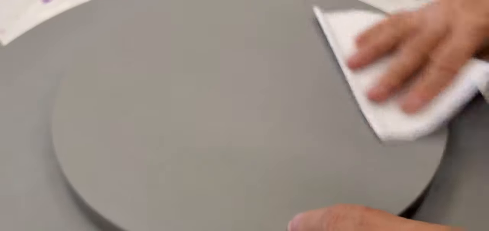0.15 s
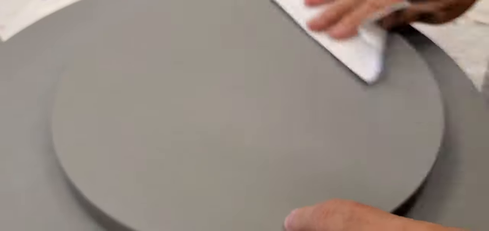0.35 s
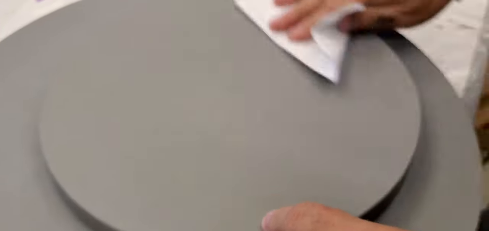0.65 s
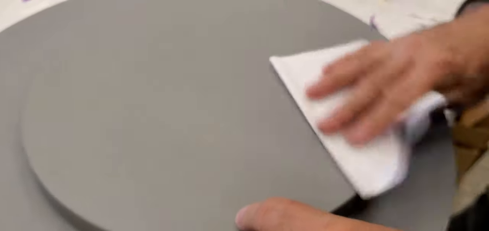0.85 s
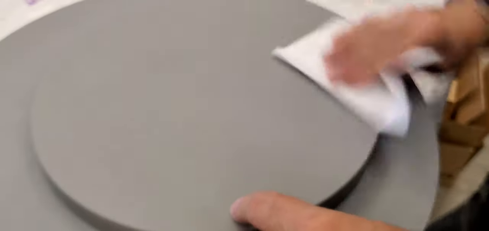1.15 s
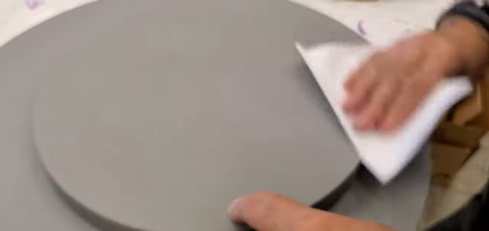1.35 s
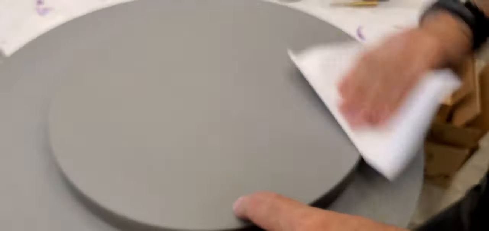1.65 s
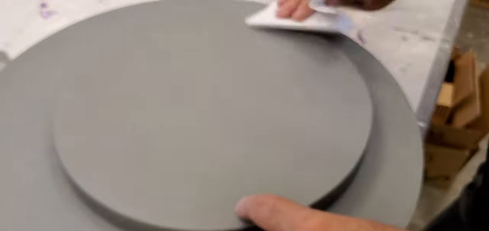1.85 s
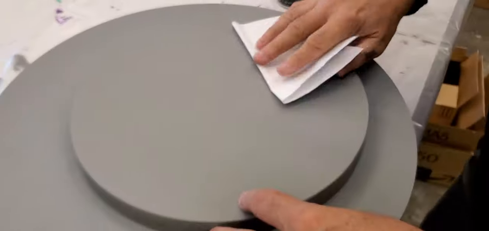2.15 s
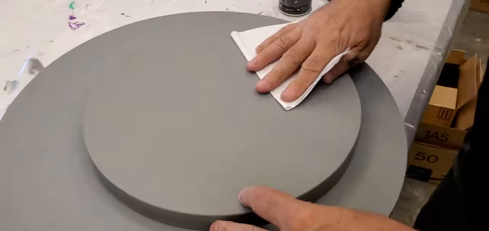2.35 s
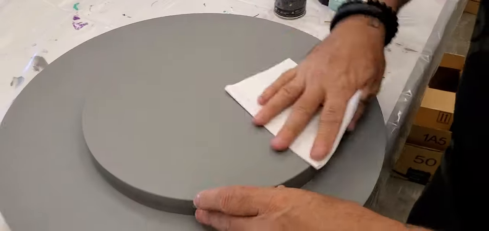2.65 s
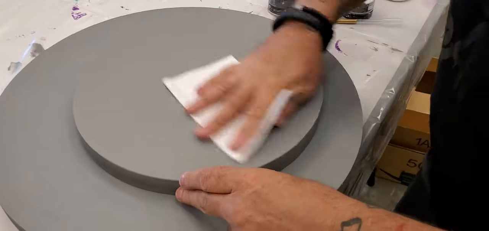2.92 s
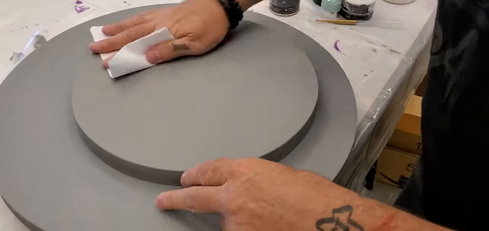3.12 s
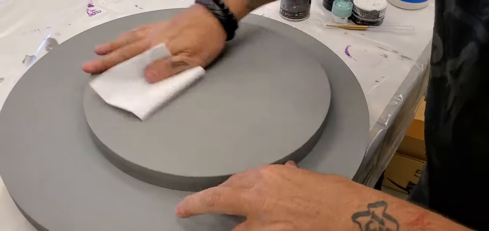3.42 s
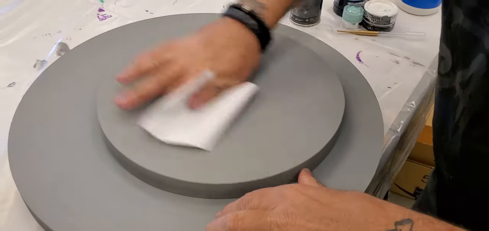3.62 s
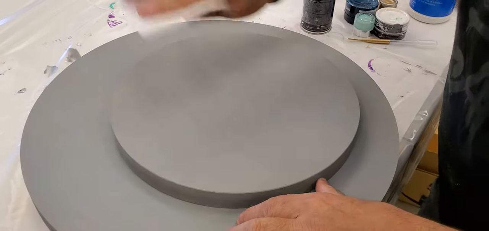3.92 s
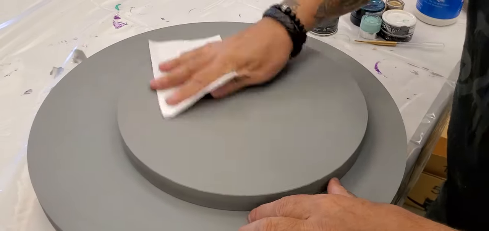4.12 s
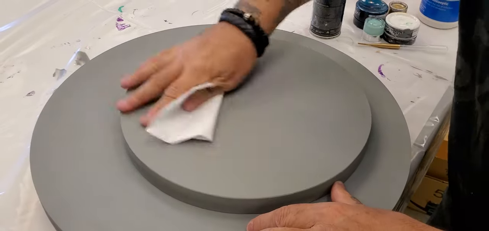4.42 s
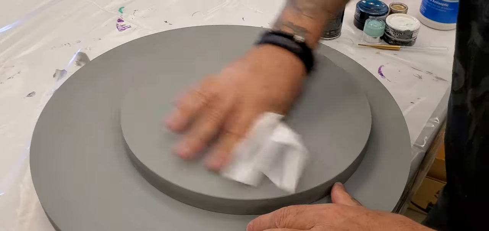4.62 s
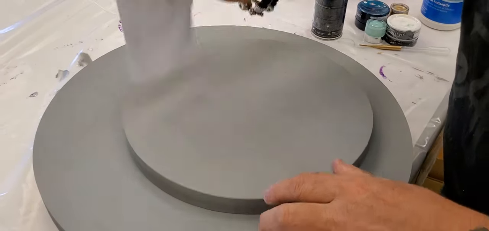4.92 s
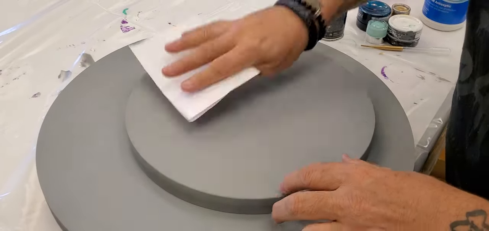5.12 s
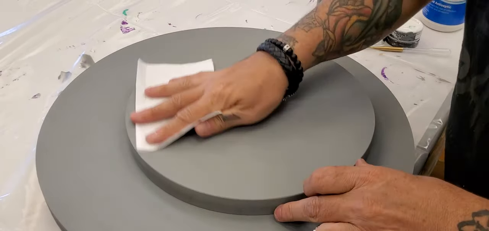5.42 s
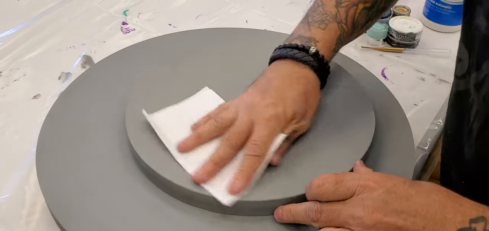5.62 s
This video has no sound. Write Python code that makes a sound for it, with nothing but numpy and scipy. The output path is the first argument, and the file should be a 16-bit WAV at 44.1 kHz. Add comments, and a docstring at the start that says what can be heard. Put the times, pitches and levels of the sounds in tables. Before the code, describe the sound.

Close to a small stereo microphone in a quiet, dry room, folded paper rubs a painted wooden disc. Bright hissing strokes, about six or seven a second, dip at every turn, with rustle and snapping creases. Around two seconds they break off into light crackles, then resume, and later become weaker and more scattered. Soft wooden knocks and tiny squeaks appear; low ventilation rumble and motor hum continue underneath.

```python
"""Indoors, a quiet room: a steady ventilation rumble and a motor's wavering hum, under everything.
From the start a folded sheet of paper is rubbed to and fro on a painted wooden disc, close to a small stereo
microphone: shaped noise hisses with the speed of the hand, nearly silent at each turn, over a crackling rustle.
Soon creases snap (short rings with noise ticks), then knocks ring the wood (decaying sines), and later
folds squeak (uneven noise through one resonance). The strokes grow weaker towards the end."""
import sys
import numpy as np
from scipy import signal
from scipy.fft import rfft, irfft, next_fast_len
from scipy.io import wavfile
from scipy.ndimage import uniform_filter1d, map_coordinates

SR = 44100
rng = np.random.default_rng(int(sys.argv[2]) if len(sys.argv) > 2 else 0)


def unload_wav(signal):
    """Save mono or channel-first audio to the path in sys.argv[1] as 16-bit WAV at rate SR, clipped to [-1, 1]."""
    wavfile.write(
        sys.argv[1],
        SR,
        np.round(np.clip(np.atleast_2d(signal).T, -1, 1) * 32767).astype(np.int16),
    )


N = 254456


def amp(db):
    """Gain of a level in dB."""
    return 10 ** (np.asarray(db) / 20)


def unit(x):
    """x scaled to rms 1."""
    return x / np.sqrt(np.mean(x ** 2) + 1e-20)


def along(points, hz):
    """Read (f/Hz, value) points on a log frequency axis."""
    f, value = np.transpose(points)
    return np.interp(np.log(hz + 1), np.log(f + 1), value)


def curves(rows):
    """One value per sample for each column after the time."""
    s, *columns = np.transpose(rows)
    return [np.interp(np.arange(N) / SR, s, column) for column in columns]


def wobble(rate):
    """A smooth random curve, rate knots a second."""
    knots = rng.standard_normal(int(N * rate / SR) + 4)
    return map_coordinates(knots, [np.arange(N) * rate / SR])


def running(x, span_s):
    """Mean over the surrounding span."""
    return np.abs(uniform_filter1d(x, size=round(span_s * SR)))


def since(s, span_s):
    """The samples of a span, and the time since its start."""
    part = slice(max(round(s * SR), 0), max(round((s + span_s) * SR), 0))
    return part, np.arange(N)[part] / SR - s


def filtered(x, response):
    """x through a response given as a function of frequency."""
    m = next_fast_len(N + SR // 2)
    return irfft(rfft(x, m) * response(np.fft.rfftfreq(m, 1 / SR)), m)[..., :N]


def tilted(x, tilt_db, pivot_hz):
    """Treble up and bass down about a pivot, half the tilt each, by an amount that may move."""
    top = filtered(x, lambda hz: 1 / (1 + (pivot_hz / (hz + 1)) ** 8))
    return (x - top) * amp(-tilt_db / 2) + top * amp(tilt_db / 2)


# likeness of the two channels, near in the bass and unrelated in the treble: (f/Hz, correlation)
CHANNEL_LIKENESS = [(60, 0.95), (240, 0.95), (950, 0.21), (3770, 0.057), (15000, 0.0)]


def stereo(pair, spectrum):
    """Two unrelated signals coloured, then mixed as mid and side to the set likeness; rms 1."""
    def mid_side_gains(hz):
        turn = np.arccos(np.clip(along(CHANNEL_LIKENESS, hz), -1, 1)) / 2
        return amp(along(spectrum, hz)) * [np.cos(turn), np.sin(turn)]

    mid, side = filtered(pair, mid_side_gains)
    return unit(np.array([mid + side, mid - side]))


def gritty(grit_db, clump_db, rate):
    """Noise for two channels with uneven contacts: spiky samples in shared clumps."""
    spikes = amp(grit_db * np.minimum(rng.standard_exponential((2, N)), 5))
    clumps = amp(clump_db * 2 * np.tanh(wobble(rate) / 2))
    return unit(clumps * spikes * rng.standard_normal((2, N)))


def patched(pair, patchy_db, size=(5, 10)):
    """Random patches of gain, size in (frequency bins, time frames), shared by both channels."""
    z = signal.stft(pair, nperseg=256)[2]
    field = rng.standard_normal(z.shape[1:])
    for axis in (0, 1):
        field = uniform_filter1d(field, size=size[axis], axis=axis)
    return signal.istft(z * amp(patchy_db * unit(field)), nperseg=256)[1][:, :N]


# colour of the ventilation rumble: (f/Hz, relative level/dB per Hz)
AIR_SPECTRUM = [(12, -41), (20, -6), (81, -0.5), (198, -12.5), (241, -19), (410, -20.5), (472, -19.5),
                (607, -27.5), (802, -26), (1190, -28.5), (1330, -26), (16000, -69)]
# duct resonances: (f/Hz, width/Hz, level/dB)
DUCT_RESONANCES = [(101.6, 14, -50), (185.4, 35, -67), (468, 68, -59.5)]
# slow changes of place and tone, also played by the hiss and the scene:
# (t/s, sheet left minus right/dB, hiss tilt about 9460 Hz/dB, hiss tilt about 5700 Hz/dB, hum level/dB)
SLOW_CHANGES = [(0, 1, 5, -1.5, -33), (1, 0, 3.5, -2.5, -34.5), (1.9, 0.5, 4.5, -6, -36),
                (2.6, 4, 2.5, -0.5, -40), (3.4, 2.5, 7, -2.5, -38), (4.2, 3, 1.5, 5, -37),
                (4.75, 3, 1.5, 2, -37.5), (5.77, 4, 1.5, 2, -35)]
MOTOR_HZ = 29.2  # shaft rate


def room_tone():
    """Ventilation noise with its duct resonances, and the wavering hum of a motor: shaft rate and its double."""
    out = amp(-41.0) * stereo(patched(rng.standard_normal((2, N)), patchy_db=1.5), AIR_SPECTRUM)
    for hz, width_hz, db in DUCT_RESONANCES:
        band = filtered(rng.standard_normal(N), lambda f: 1 / (1 + (2 * (f - hz) / width_hz) ** 2))
        out += amp(db) * unit(band)
    shaft = 2 * np.pi * MOTOR_HZ * np.arange(N) / SR + 0.3 * wobble(2.26)
    hum = amp(-5.5 + 1.9 * wobble(3.7)) * np.sin(shaft)
    hum += amp(1.5 * wobble(4.7)) * np.sin(2 * shaft)
    _, _, _, hum_db = curves(SLOW_CHANGES)
    return out + amp(hum_db) * hum


# strokes of the hand, light drags included:
# (start t/s, length/s, hiss level at full speed in mid-stroke/dB, pressure growth/dB per s, time to gain speed/s)
STROKES = [(-0.062, 0.076, -10.5, -3, 0.005), (0.014, 0.17, -16.5, -4, 0.053),
           (0.175, 0.14, -11.5, 3, 0.097), (0.311, 0.17, -12, 0, 0.113), (0.47, 0.15, -10, 16, 0.12),
           (0.61, 0.17, -11.5, -3, 0.12), (0.776, 0.14, -11, 11, 0.079), (0.912, 0.15, -16, 46, 0.026),
           (1.046, 0.13, -10.5, 56, 0.12), (1.176, 0.15, -12.5, 16, 0.119), (1.327, 0.15, -12.5, 26, 0.1),
           (1.471, 0.17, -20.5, 76, 0.012), (1.635, 0.14, -12.5, 29, 0.12), (1.756, 0.24, -16.5, 0, 0.119),
           (1.992, 0.21, -41.5, -112, 0.019), (2.139, 0.059, -25.5, 2, 0.025), (2.19, 0.28, -45, 30, 0.03),
           (2.426, 0.163, -17.5, 65, 0.119), (2.551, 0.18, -12, 26, 0.12), (2.727, 0.19, -17.5, -16, 0.078),
           (2.897, 0.16, -16.5, -16, 0.075), (3.053, 0.17, -16.5, -10, 0.078), (3.217, 0.13, -15, 7, 0.065),
           (3.335, 0.16, -20, 33, 0.12), (3.49, 0.14, -21, 3, 0.06), (3.625, 0.1, -15.5, 1, 0.056),
           (3.693, 0.16, -29, 110, 0.005), (3.803, 0.12, -51, -178, 0.005), (3.936, 0.061, -29, 3, 0.116),
           (4.001, 0.061, -46, -6, 0.016), (4.075, 0.12, -37, -10, 0.056), (4.163, 0.18, -22.5, 65, 0.031),
           (4.336, 0.16, -18.5, 51, 0.12), (4.496, 0.15, -21.5, -108, 0.063),
           (4.648, 0.12, -18.5, -17, 0.055), (4.758, 0.068, -25, -40, 0.013),
           (4.799, 0.15, -45.5, 80, 0.12), (5.05, 0.18, -57.5, -33, 0.013),
           (5.227, 0.13, -41.5, -130, 0.024), (5.3, 0.28, -27, 75, 0.12), (5.556, 0.31, -22, 46, 0.005)]
BRAKE_S, REST_DB = 0.053, -66.5  # time to lose speed before a turn; hiss power of the sheet at rest


def rub_power():
    """Each stroke gains speed, presses harder or lighter on its way and brakes; strokes add in power."""
    power = np.full(N, amp(REST_DB) ** 2)
    for s, length, db, grow_db, gain_s in STROKES:
        part, u = since(s, length)
        speed = np.tanh(u / gain_s) * np.tanh((length - u) / BRAKE_S)
        pressure = amp(db + grow_db * (u - length / 2))
        power[part] += (pressure * speed) ** 2
    return power


# colour of fibres on paint: (f/Hz, relative level/dB per Hz)
HISS_SPECTRUM = [(590, -29), (1000, -33), (1320, -22), (1650, -20.5), (2390, -11.5), (2560, -11),
                 (3710, -6.5), (5020, -7.5), (7400, 2.5), (8200, 1.5), (9170, -3.5), (11000, -4.5),
                 (13200, -1), (16000, -3.5)]
# the sheet is slack just after a turn: dip of the treble tilt, its moment in the stroke, its width
SLACK_DB, SLACK_AT_S, SLACK_S = 3.5, 0.025, 0.026


def hiss():
    """Fibres drag over the paint; loudness follows the speed, which passes through zero at each turn."""
    power = rub_power()
    _, bright_db, airy_db, _ = curves(SLOW_CHANGES)
    pressed_db = 10 * np.log10(running(power, span_s=0.033))
    bright_db = bright_db + 0.16 * (pressed_db + 29)  # a firm hand is brighter
    for s, *_ in STROKES:
        part, u = since(s, SLACK_AT_S + 2 * SLACK_S)
        bright_db[part] -= SLACK_DB * np.exp(-((u - SLACK_AT_S) / SLACK_S) ** 2)
    drag = patched(gritty(grit_db=1.2, clump_db=1.16, rate=320), patchy_db=2.0)
    drag = patched(drag, patchy_db=1.5, size=(9, 40))  # the colour shifts as the sheet changes its lie
    catches = rng.uniform(size=N) < 350 / SR  # about 350 a second: a fibre catches on a grain of paint
    catch_size = amp(11) * np.tanh(rng.standard_exponential(N) / 2)
    snags = catches * catch_size * rng.normal(1, 0.5, (2, N))
    fibres = tilted(stereo(drag + snags, HISS_SPECTRUM), airy_db, pivot_hz=5700)
    return np.sqrt(power) * tilted(fibres, bright_db, pivot_hz=9460)


# the loose part of the sheet flexing: (start t/s, rise/s, rustle level/dB, stiffness as treble over bass/dB)
FLEXES = [(0.315, 0.026, -33.5, -3), (0.474, 0.035, -31, 1), (0.616, 0.019, -29, 1),
          (0.695, 0.0043, -31, -8.5), (0.79, 0.021, -27.5, -8), (0.918, 0.02, -34, -2),
          (1.071, 0.021, -32.5, -9), (1.171, 0.048, -33, -5.5), (1.257, 0.008, -31, 8),
          (1.34, 0.028, -28, -4.5), (1.481, 0.011, -26.5, -1), (1.512, 0.049, -33, -8),
          (1.663, 0.016, -27, -2.5), (1.765, 0.071, -39, -6), (1.828, 0.016, -29, -4),
          (2.157, 0.009, -34, -2), (2.27, 0.076, -47, 7), (2.44, 0.047, -45, 22), (2.614, 0.022, -38.5, 21),
          (3.184, 0.063, -32, -1), (3.229, 0.012, -26, 7), (3.36, 0.06, -33.5, 4), (3.706, 0.032, -38, 1),
          (3.844, 0.0073, -44.5, -12), (3.941, 0.02, -42.5, -5), (4.098, 0.03, -34.5, -1),
          (4.336, 0.052, -33.5, 1.5), (4.434, 0.0076, -24, -2), (4.497, 0.0083, -30.5, -11),
          (4.639, 0.051, -34.5, 0.5), (5.073, 0.013, -42, -6), (5.251, 0.009, -29.5, -7)]
# steady rustle: level against the hiss, its stiffness, and the averaging span that carries it over the turns
STIR_DB, STIR_STIFF_DB, STIR_S = -22.5, -1.5, 0.21


def flexing():
    """Power and stiffness of the rustle: a steady stir under the hand, and flexes that swell fast and die slowly."""
    power = amp(STIR_DB) ** 2 * running(rub_power(), STIR_S)
    weighted_stiff = power * STIR_STIFF_DB
    for s, rise, db, stiff_db in FLEXES:
        part, u = since(s, 10 * rise)
        swell = (amp(db) * u / rise * np.exp(1 - u / rise)) ** 2
        power[part] += swell
        weighted_stiff[part] += swell * stiff_db
    return power, weighted_stiff / power


# resonances of the sheet: (f/Hz, relative level/dB per Hz)
SHEET_SPECTRUM = [(300, -10.5), (600, -11), (900, -8.5), (1500, -1), (2100, -3), (3100, -1), (4500, -11),
                  (8000, -20)]


def rustle():
    """Small creases give way in clumps and sound through the sheet's resonances."""
    power, stiff_db = flexing()
    creases = patched(gritty(grit_db=3, clump_db=2.5, rate=330), patchy_db=3.5)
    return np.sqrt(power) * tilted(stereo(creases, SHEET_SPECTRUM), stiff_db, pivot_hz=1630)


# chance creases: level against the rustle, spread of levels, mean tick over ring, middle pitch
CRACKLE_DB, CRACKLE_SPREAD_DB, CRACKLE_TREBLE_DB, CRACKLE_HZ = 2, 2, 0.5, 2550


def crackles():
    """Small creases that snap by chance, louder while the sheet flexes: rows like those of the snaps."""
    when, size, pitch, tone = rng.uniform(0.001, 0.999, (240, 4)).T
    rustle_power, _ = flexing()
    level_db = 10 * np.log10(rustle_power[(when * N).astype(int)]) + CRACKLE_DB
    level_db -= CRACKLE_SPREAD_DB * np.log(size + 0.05)  # a few are much louder
    treble_db = CRACKLE_TREBLE_DB + 10 * (tone - 0.5)
    hz = CRACKLE_HZ * 2 ** (1.5 * (pitch - 0.5))
    return list(zip(when * N / SR, level_db, treble_db, hz))


# creases snapping: (t/s, ring level/dB, tick over ring/dB, nominal f/Hz)
SNAPS = [(0.493, -25, 8, 2850), (0.545, -16, -6, 2640), (.562, -21, 0, 3580), (0.6286, -23, 7, 1650),
         (0.8002, -24.5, 8, 2880), (0.826, -17.5, 4.5, 2660), (0.9314, -16.5, -8, 3600),
         (1.037, -19.5, 1, 3160), (1.261, -15.5, 3, 2900), (1.35, -23.5, 3, 3180), (1.377, -21, 4, 2630),
         (1.426, -23, 5, 3000), (1.4853, -21.5, 7.5, 1580), (1.507, -26, 13, 1410), (1.527, -18, -11, 1500),
         (1.7893, -25.5, 7, 1510), (1.8365, -17.5, -2, 1610), (1.862, -19, 6.5, 3380),
         (2.165, -24.5, -1.5, 3060), (2.258, -37, 17, 2340), (2.282, -27.5, -6, 2140),
         (2.2929, -26, 1.5, 3200), (2.3147, -25, -25, 3050), (2.333, -27.5, -3.5, 2660),
         (2.3585, -39, -10, 2360), (2.3689, -20, 0.5, 2360), (2.3738, -16.5, -7, 2730),
         (2.7495, -24, -16, 2100), (3.0784, -30.5, 10, 2080), (3.2317, -17.5, -20.5, 2030),
         (3.237, -13, -28, 2060), (3.24, -10.5, -30, 3020), (3.42, -20.5, 7, 1330), (3.4345, -21, 3, 1240),
         (3.9473, -33, -5, 2020), (3.9604, -34, -3, 2060), (3.98, -34, 4, 1260), (4.0805, -45, 5, 1240),
         (4.121, -23, -12, 2160), (4.138, -21.5, -10.5, 2340), (4.1807, -24.5, -10, 2280),
         (4.2218, -23, 2, 2220), (4.351, -35, 0, 3420), (4.3635, -31, 10, 1860), (4.3893, -22.5, 3, 3630),
         (4.443, -14.5, -11, 3550), (4.501, -30, -11, 1450), (4.5138, -22, 3, 2080),
         (4.672, -28, -12, 1700), (4.6875, -23, -7, 2400), (4.6983, -14, -4, 1950), (5.066, -37, 9, 2070),
         (5.083, -30.5, 3, 2070), (5.2528, -27, -22, 3000), (5.348, -24, 1.5, 2290),
         (5.4647, -24, 10, 1310), (5.676, -28.5, -8, 1550), (5.7524, -20, 1, 2970)]
# colour of the tick: (f/Hz, gain/dB)
TICK_SPECTRUM = [(1200, -24), (4000, 0), (7800, 6), (10500, 2.5), (14000, 0.5)]


def snaps():
    """Each snap: a few cycles of the buckling sheet and a sharp tick with a short scatter after it."""
    out, ticks = np.zeros((2, N + SR)), np.zeros((2, N + SR))
    t = np.arange(SR // 20) / SR

    def swell(rise):
        return t / rise * np.exp(1 - t / rise)

    for s, db, treble_db, hz in SNAPS + crackles():
        k = round(s * SR)
        detune = np.exp(rng.normal(0, [[0.03], [0.1], [0.1]]))
        pitches = hz * np.array([[1], [1.75], [0.66]]) * detune
        lag = rng.uniform(0, 1.6, (2, 3, 1))  # radians: the two capsules hear different parts of the sheet
        ring = (amp([[0], [-5], [-6]]) * np.sin(2 * np.pi * pitches * t + lag)).sum(axis=1)
        ring_fade = swell(1.0 / hz) + amp(-18 - 60 * t / 0.06) * np.tanh(t * hz)
        out[:, k:k + len(t)] += amp(db) * ring * ring_fade
        tick_fade = swell(0.0004) + amp(-14 - 60 * t / 0.03)  # sharp tick, then the scatter
        tick = tick_fade * rng.standard_normal((2, len(t)))
        ticks[:, k:k + len(t)] += amp(db + treble_db + 1.0) * tick
    return out[:, :N] + filtered(ticks[:, :N], lambda hz: amp(along(TICK_SPECTRUM, hz)))


# fingers and folds knocking the disc: (t/s, ring level/dB, click level/dB)
KNOCKS = [(.793, -33.5, -52), (1.261, -26.5, -37), (1.375, -29.5, -38), (1.576, -29, -19),
          (1.851, -31.5, -41), (2.171, -28.5, -17), (2.709, -49, -8), (4.124, -37.5, -18),
          (5.2564, -33.5, -14)]
# modes of the wooden disc, level and pitch varying a little per blow: (nominal f/Hz, mean level/dB, t60/s)
DISC_MODES = [(418.5, 4, 0.053), (477, 2, 0.036), (312, -8.5, 0.064), (190, -1, 0.036)]


def knocks():
    """A blow rings the modes of the wooden disc and adds a dry click, its level set separately for each blow."""
    out, t = np.zeros(N + SR), np.arange(SR // 4) / SR
    for s, ring_db, click_db in KNOCKS:
        ring = np.zeros(len(t))
        for hz, level, t60 in DISC_MODES:
            decay = amp(level + rng.normal(0, 1.2) - 60 * t / t60)
            ring += decay * np.sin(2 * np.pi * hz * rng.normal(1, 0.048) * t)
        ring *= 1 - np.exp(-t / 0.0022)  # soft onset
        click = (1 - t / 0.00033) * np.exp(-t / 0.00015)
        out[round(s * SR):][:len(t)] += amp(ring_db) * ring + amp(click_db) * click
    return out[:N]


# a fold stutters over the paint and sings in the air pocket under it: (t/s, length/s, level/dB, f/Hz)
SQUEAKS = [(1.488, 0.062, -30.5, 1460), (1.784, 0.088, -31, 1483), (3.245, 0.044, -32.5, 1004),
           (3.278, 0.033, -34.5, 1080), (3.248, 0.096, -40, 736), (4.596, 0.24, -42.5, 1500),
           (5.255, 0.034, -37.5, 1035), (5.256, 0.035, -40, 1440), (5.292, .02, -40, 1070),
           (5.297, 0.029, -44, 1450), (5.515, 0.4, -50, 1650)]


def squeaks():
    """Uneven slips ring one resonance; the stutter starts at once and fades as the fold flattens."""
    out, t = np.zeros((2, N)), np.arange(N) / SR
    slips = gritty(grit_db=4.5, clump_db=2.0, rate=96)
    slips = slips + slips[0]  # partly alike at both capsules
    for s, length, db, hz in SQUEAKS:
        width = hz / 13
        sung = unit(filtered(slips, lambda f: 1j * f * width / (hz * hz - f * f + 1j * f * width)))
        u = np.clip((t - s) / length, 0, 1)
        out += amp(db) * sung * np.tanh(15 * u) * np.sqrt(1 - u)
    return out


def room(x, t60):
    """A short diffuse answer of the room, decaying noise duller than the source."""
    t = np.arange(SR // 3) / SR
    tail = rng.standard_normal((2, len(t))) * amp(-60 * t / t60)
    wet = signal.fftconvolve(x, tail / np.linalg.norm(tail[0]), axes=1)[:, :N]
    return filtered(wet, lambda hz: 1 / (1 + hz / 3000))


def scene():
    """The sheet moves across the stereo field, the knocks stay in the middle; the room surrounds them."""
    pan_db = curves(SLOW_CHANGES)[0]
    sheet = hiss() + rustle() + squeaks() + snaps()
    close = sheet * amp([pan_db / 2, -pan_db / 2]) + knocks()
    return close + amp(-9) * room(close, t60=0.068) + room_tone()


# colour of the microphone pair: (f/Hz, left minus right/dB)
CAPSULE_DIFFERENCE = [(100, -0.5), (300, 0), (700, -2), (4400, -1.5), (8500, -4), (13000, -0.5)]
TOP_HZ = 15950  # band limit


def record(dry):
    """The two capsules differ a little in colour; nothing is kept above the band limit."""
    def capsules(hz):
        half_db = along(CAPSULE_DIFFERENCE, hz) / 2
        return amp([half_db, -half_db]) * (hz < TOP_HZ)

    return filtered(dry, capsules)


dry = scene()
out = record(dry)
unload_wav(out)
```